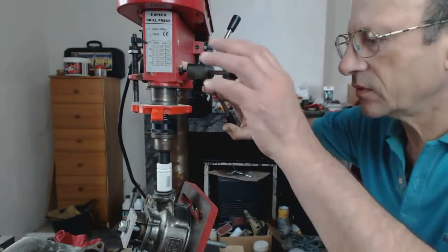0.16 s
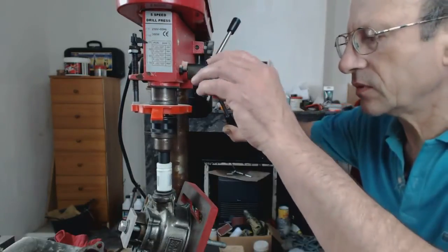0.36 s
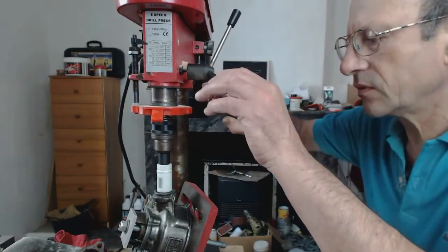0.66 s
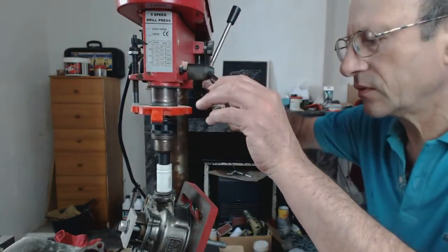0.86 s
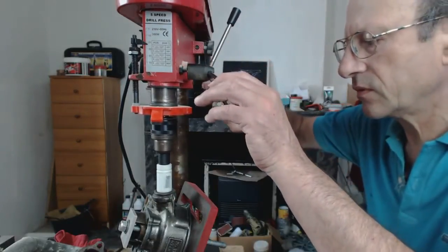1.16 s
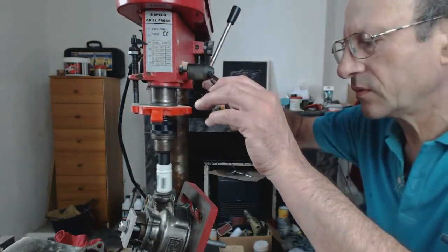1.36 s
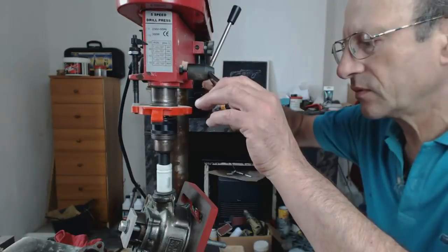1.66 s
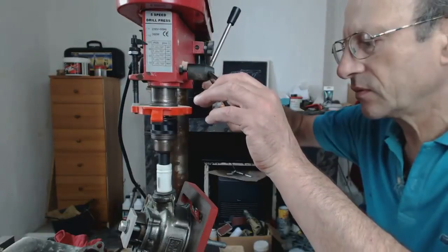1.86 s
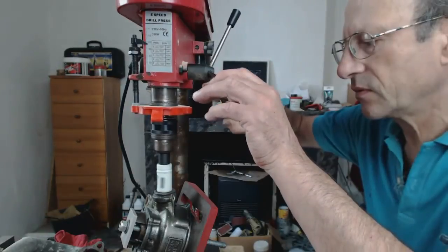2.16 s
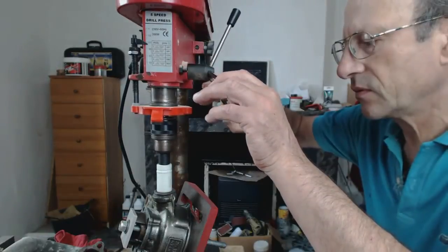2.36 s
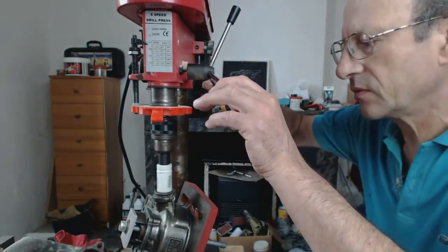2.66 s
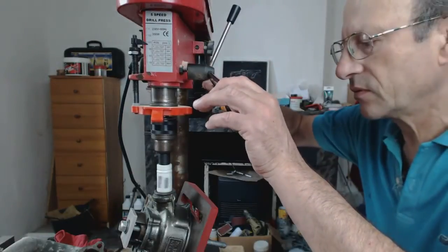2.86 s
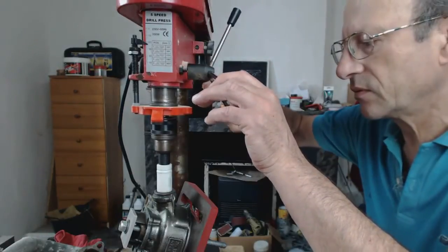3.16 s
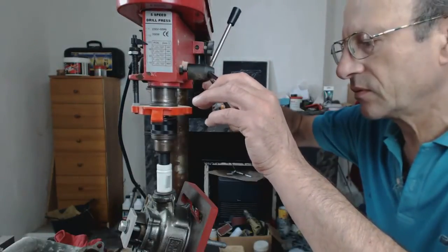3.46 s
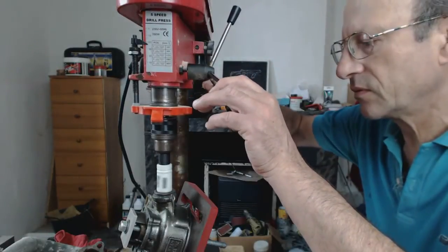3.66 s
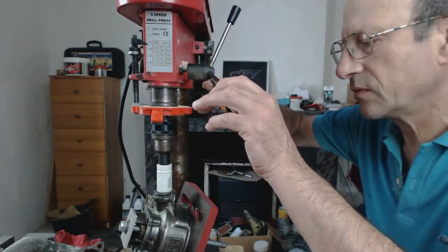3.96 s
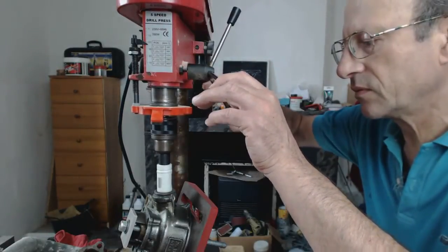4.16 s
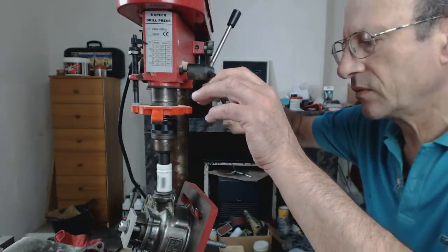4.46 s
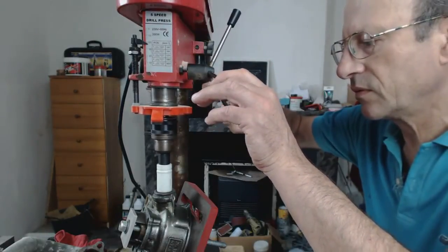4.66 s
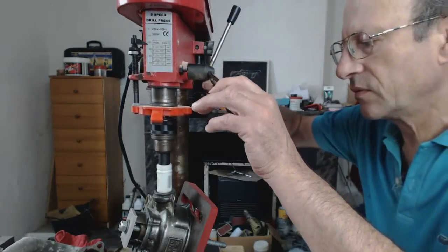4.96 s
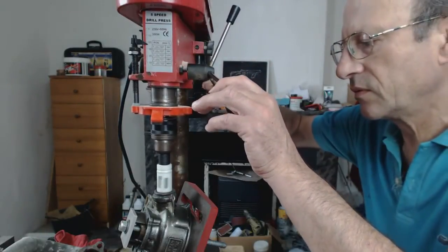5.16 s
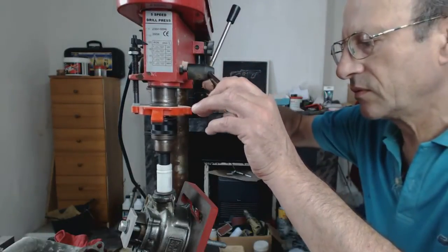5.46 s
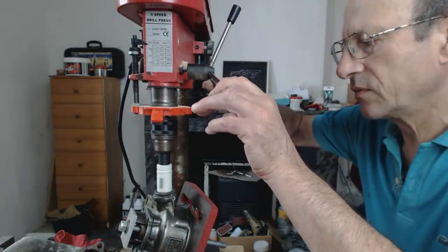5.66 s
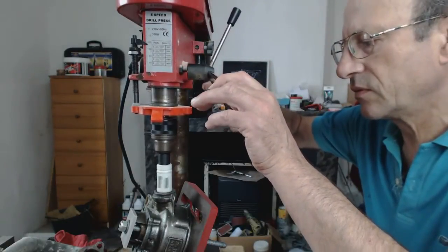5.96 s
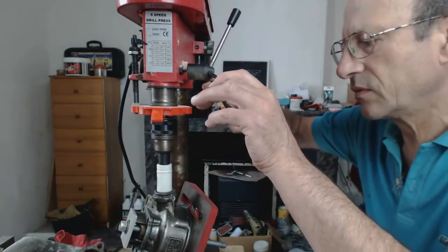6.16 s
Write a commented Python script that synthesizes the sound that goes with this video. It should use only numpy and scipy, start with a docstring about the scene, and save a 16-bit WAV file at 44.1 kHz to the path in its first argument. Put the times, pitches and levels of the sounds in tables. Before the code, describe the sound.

A drill press runs close to the microphone in a small workshop, its motor giving a quiet rumble and hum, with light spindle ticks and brief high squeals of the tool touching metal. At about 0.85 seconds it bites into cast iron: a loud, grinding, ringing chatter with a low groan, crackling chips and dull knocks of the part on its table, lasting until 2.1 seconds. Three more cuts follow, from about 2.6 to 3.3, 3.6 to 4.4 and 4.9 to 6.1 seconds. The crackle turns slightly hollow late in each cut, and the microphone overloads, making the cuts sound rough. In the short gaps the much quieter motor continues, with ticks and thin squeals, clearest just before the first and last cuts. The last cut ends with a few short shudders and falls back to the hum by about 6.2 seconds.

```python
"""A pedestal drill press, close to the microphone in a small workshop, is fed four times into cast iron.
Each cut jolts the resonances of head, part and column, snaps off chips and knocks the part on its table.
Between cuts the motor rumbles and hums, the spindle ticks and a loosely touching edge squeals.
The walls add a short tail; at this distance the microphone overloads during the cuts."""
import sys
import numpy as np
from scipy import signal
from scipy.fft import rfft, irfft
from scipy.io import wavfile
from scipy.ndimage import uniform_filter1d

SR = 44100
rng = np.random.default_rng(int(sys.argv[2]) if len(sys.argv) > 2 else 0)


def pcm_store(signal):
    """Save signal as 16-bit PCM."""
    levels = np.round(np.clip(np.atleast_2d(signal), -1, 1) * 32767)
    wavfile.write(sys.argv[1], SR, levels.astype(np.int16).T)


N = 277830

# Modes of head (first five), part (next four) and edge. Each row: pitch in Hz, width in Hz, gain in dB.
FRAME_MODES = [(595, 99, -17), (658, 31.5, 4), (711.6, 14, -9.5), (794, 18, -14), (794, 6.1, -6.5),
               (916.3, 30.4, -4), (1000.8, 11.5, 1.5), (1089, 66, -8), (1260, 63, -30), (1426, 23, -10),
               (1785, 24, -12), (2100, 13, -42), (2585, 27, -11.5), (3113, 17, -17), (3545, 25.5, -16),
               (4140, 33, -23.5)]
# Low modes of the column. Each row: pitch in Hz, width in Hz, gain in dB.
COLUMN_MODES = [(323.8, 8.3, -9), (349.7, 12.4, -6), (395.3, 13.3, 2), (444.2, 8.4, -0.5)]


def amp(db):
    """Gain of a dB value."""
    return 10 ** (np.asarray(db) / 20)


def rms_one(x):
    """Scale to rms 1."""
    return x / np.sqrt(np.mean(x ** 2) + 1e-20)


def butter(x, hz, order, kind="low"):
    """Butterworth filter, low-pass by default."""
    return signal.sosfilt(signal.butter(order, hz, kind, fs=SR, output="sos"), x)


def per_bin(hz, values):
    """Join points along log frequency, one value per FFT bin."""
    grid = np.maximum(np.arange(N // 2 + 1) * SR / N, 1)
    return np.interp(np.log(grid), np.log(hz), values)


def colour(x, spectrum):
    """Shape a sound by (Hz, dB) points."""
    return irfft(rfft(x) * amp(per_bin(*np.transpose(spectrum))), N)


def drift(hz):
    """Slow random wander, rms 1."""
    r = np.exp(-2 * np.pi * hz / SR)
    return rms_one(signal.lfilter([1], [1, -2 * r, r * r], rng.standard_normal(N + SR))[SR:])


def grains(per_s, spread_db):
    """Random clicks of uneven size and sign, rms 1."""
    sizes = amp(spread_db * np.minimum(rng.exponential(1, N), 5)) * rng.choice([-1, 1], N)
    return rms_one(sizes * (rng.random(N) < per_s / SR))


def decay(clicks, seconds):
    """Give each click an exponential tail."""
    return signal.lfilter([1], [1, -np.exp(-1 / (seconds * SR))], clicks)


def resonate(x, modes):
    """Parallel resonances (Hz, width in Hz, dB) with alternating signs."""
    out = 0
    for k, (hz, width, db) in enumerate(modes):
        r = np.exp(-np.pi * width / SR)
        b = (1 - r * r) / 2 * np.array([1, 0, -1])
        a = [1, -2 * r * np.cos(2 * np.pi * hz / SR), r * r]
        out = out + (-1) ** k * amp(db) * signal.lfilter(b, a, x)
    return out


def evened(ring, samples):
    """A steadily driven ring keeps its swing: slow beats are mostly levelled."""
    swing = np.sqrt(uniform_filter1d(ring ** 2, size=samples)) / np.std(ring)
    return rms_one(ring / (swing + 0.2))


def workshop(x, t60):
    """The walls of a small room return a short, dense tail."""
    t = np.arange(round(.5 * SR)) / SR
    tail = rng.standard_normal(len(t)) * amp(-60 * t / t60) * (t > .001)
    return signal.fftconvolve(x, tail / np.sqrt(np.sum(tail ** 2)))[:N]


def motor():
    """The running motor rumbles through column and frame, over its mains hum."""
    # Colour of the rumble. Each row: frequency in Hz, gain in dB.
    idle_spectrum = [(24, -56), (40, -37), (86, -30.5), (202, -2), (271, 4), (381, 1.5), (499, -35),
                     (654, -1.5), (992, -15.5), (1400, 2), (5520, -51), (6880, -22), (14000, -71)]
    # Mains hum. Each row: frequency in Hz, rms level in dB.
    hum_tones = [(100, -61.5), (200, -63)]
    t, noise = np.arange(N) / SR, rng.standard_normal(N)
    shaken = noise + amp(16) * resonate(noise, COLUMN_MODES + FRAME_MODES)
    rumble = rms_one(colour(shaken, idle_spectrum)) * amp(-46 + 2 * drift(hz=8.6))
    return rumble + sum(np.sqrt(2) * amp(db) * np.sin(2 * np.pi * hz * t) for hz, db in hum_tones)


def spindle():
    """Play in the spindle makes bright ticks, each with a blunt blow that rings the frame."""
    # Each row: start in seconds, tick strength in dB, blow relative to the tick in dB.
    ticks = [(0.044, -32, -15), (0.1444, -47, -1), (0.2094, -60, -4), (0.2244, -59, -1), (0.2714, -54, 9),
             (0.3414, -60, 23.5), (0.388, -62, 5), (0.4239, -67, 20), (0.4773, -56, 3), (0.5197, -68, 15),
             (0.554, -58, 20), (0.598, -51, -4), (0.6724, -53, 15), (0.7244, -61, 2), (0.7667, -47, -1),
             (2.1594, -34, 14), (2.1994, -45, -15), (2.36, -49, -6), (3.3997, -44, 5), (3.476, -47, -1),
             (3.581, -21.5, -13), (4.569, -57, -9), (4.6648, -44.5, -2), (4.7526, -41, -16),
             (4.8194, -46, 13)]
    clicks, blows = np.zeros((2, N))
    for s, db, blow_db in ticks:
        clicks[round(s * SR)] = amp(db)
        blows[round(s * SR)] = amp(db + blow_db)
    clicks += amp(-91) * np.abs(grains(per_s=60, spread_db=14.5))   # faint rattle between the ticks
    envelope = butter(decay(clicks, seconds=.014), 300, order=1)
    ticking = butter(envelope * rng.standard_normal(N), [2200, 8500], order=4, kind="band")
    blunt = butter(blows + 1e-18, 1250, order=3)
    return ticking + amp(42) * resonate(blunt, FRAME_MODES)


def edge_squeal():
    """A light touch of the edge excites high modes of the tool: quick attack, slow sag, release."""
    # Each row: start in seconds, length in seconds, squeal level in dB, thin whistle level in dB.
    touches = [(0.0, 0.026, -50, -75), (0.058, 0.056, -45.5, -55), (.15, .04, -53, -65),
               (0.218, 0.064, -57, -72), (0.763, 0.12, -36.5, -60), (.845, .03, -28, -60),
               (2.104, 0.25, -48, -78), (2.355, .09, -52, -83), (3.3, 0.064, -48.5, -72),
               (3.392, 0.028, -46, -74), (3.48, 0.1, -46.5, -80), (4.33, 0.15, -45, -80),
               (4.485, .04, -54, -85), (4.563, .05, -51, -86), (4.658, 0.068, -52, -67),
               (4.746, 0.038, -39.5, -66), (4.838, 0.055, -49, -71), (4.9, .07, -33, -62),
               (5.93, .04, -45.5, -64), (5.983, .03, -45.5, -55), (6.03, .2, -52, -78)]
    # The tool's high modes, in two sets. Each row: pitch in Hz, width in Hz, gain in dB.
    squeal_modes = [(5800, 10, -3.5), (6050, 35, -11), (6550, 60, -20.5), (6770, 69, -24),
                    (8500, 220, -25.5)]
    whistle_modes = [(14100, 70, 0), (12500, 70, -15)]
    attack_s, release_db_per_s = 0.0048, 350
    squeal_sag_db_per_s, whistle_sag_db_per_s = 63, 305
    squeal_gain, whistle_gain = np.zeros((2, N))
    for s, length, squeal_db, whistle_db in touches:
        t = np.maximum(np.arange(N) / SR - s, 0)
        touch = np.minimum(t / attack_s, 1) * amp(-release_db_per_s * np.maximum(t - length, 0))
        squeal_gain += touch * amp(squeal_db - squeal_sag_db_per_s * t)
        whistle_gain += touch * amp(whistle_db - whistle_sag_db_per_s * t)
    slip = rng.standard_normal((2, N))
    squeal = evened(resonate(resonate(slip[0], squeal_modes), [(5700, 1400, 0)]), samples=900)
    whistle = rms_one(resonate(resonate(slip[1], whistle_modes), [(13800, 2500, 0)]))
    return squeal_gain * squeal + whistle_gain * whistle


def table_knocks(shake_db):
    """The part knocks its table: dull thumps of a cycle or two over a rumble that follows the feed."""
    # Each row: start in seconds, strength in dB.
    knocks = [(0.919, -29), (1.015, -13), (1.163, -15), (1.515, -24), (1.555, -29), (1.608, -7.5),
              (1.731, -22), (1.833, -7), (1.873, -3.5), (1.931, -2), (2.039, -15), (2.078, -16),
              (2.136, -29), (2.609, -27), (2.661, -35), (2.784, -4), (2.884, -7), (2.921, -4.5),
              (2.988, -6), (3.008, 1.5), (3.065, -14), (3.115, 4), (3.702, -14), (3.759, -9), (3.827, -29),
              (3.887, -5), (3.978, 0), (3.998, -3), (4.034, -6.5), (4.15, -2.5), (4.99, -23), (5.106, -25),
              (5.148, -14), (5.227, -9.5), (5.254, -6.5), (5.318, -16), (5.413, -2.5), (5.484, -5),
              (5.532, -3.5), (5.557, -4), (5.601, -0.5), (5.703, -2.5), (5.811, -2.5), (5.9, 0),
              (5.986, -12)]
    # Modes of the table. Each row: pitch in Hz, width in Hz, gain in dB.
    table_modes = [(110, 40, -3.5), (157, 17.5, 0), (233, 90, -3.5)]
    jolts = resonate(grains(per_s=120, spread_db=-1.5), [(175, 84, 0)])
    rumble_db = 0.5 + shake_db + 2.07 * np.clip(shake_db + 10, -10, 0)
    out = amp(rumble_db) * rms_one(resonate(jolts, table_modes))
    t = np.arange(round(.04 * SR)) / SR
    swell = np.exp(-((t - .011) / 0.0031) ** 2)
    for s, db in knocks:
        at, hz, phase = round(s * SR), rng.uniform(150, 250), rng.random()
        size = amp(db + 4 + .3 * max(db + 22, 0))
        out[at:at + len(t)] += size * swell * np.sin(2 * np.pi * (hz * t + phase))
    return out


def chips(chip_db):
    """Chips break off in clumps: dense snaps with short tails; a light touch is duller."""
    # Colour of the crackle. Each row: frequency in Hz, gain in dB.
    chip_spectrum = [(880, -8.5), (1500, -4), (1890, 4.5), (2290, -3), (2520, 0), (3860, -8), (5100, -5),
                     (7500, -13.5), (9820, -15.5), (14200, -37), (15000, -17)]
    snaps = grains(per_s=250, spread_db=0.5) * amp(4.2 * drift(hz=18))
    tails = decay(np.abs(snaps), seconds=0.0023) * rng.standard_normal(N)
    hiss = amp(2 + 0.17 * drift(hz=45)) * rng.standard_normal(N)
    bright = rms_one(colour(rms_one(tails) + hiss, chip_spectrum))
    dull = butter(bright, 7800, order=4)
    bite = np.clip((chip_db + 55) / 22, 0, 1) ** 2
    return amp(chip_db + 1.115 * np.maximum(chip_db + 23.5, 0)) * (dull + bite * (bright - dull))


def hollowed(crackle):
    """Late in each cut the crackle turns hollow as a treble band sinks."""
    # Each row: start in seconds, end in seconds, depth from 0 to 1.
    spells = [(1.734, 2.1, 0.63), (3.196, 3.3, .4), (4.273, 4.35, 0.66), (5.695, 5.92, .55)]
    # The band that sinks. Its row: centre in Hz, width in Hz, gain in dB.
    band = [(6150, 1500, 1.5)]
    t = np.arange(N) / SR
    dip = sum(depth * (t > start) * (t < end) for start, end, depth in spells)
    return crackle - uniform_filter1d(dip, size=800) * resonate(crackle, band)


def with_catches(db, member):
    """One member's drive in dB: it wavers, and swells briefly when the tool catches and shakes it."""
    # Each row: time of the peak in seconds, member shaken, peak drive in dB.
    catches = [(.09, "column", -36), (0.089, "part", -38.5), (.26, "column", -32.5), (.32, "column", -38.5),
               (.535, "head", -38), (.59, "head", -40), (.79, "column", -34), (.795, "head", -33),
               (2.03, "part", -19), (2.07, "part", -19.5), (3.33, "part", -29.5), (3.425, "column", -20.5),
               (3.63, "part", -11), (4.38, "edge", -26.5), (4.399, "column", -19), (4.905, "edge", -24.5),
               (0.866, "column", -17), (.93, "part", -13), (1.42, "part", -12.5), (4.77, "part", -47),
               (4.82, "head", -35), (5.94, "part", -16.5), (5.96, "head", -19.5), (5.99, "part", -14.5),
               (6.03, "column", -16.5), (6.049, "head", -16.5), (6.09, "column", -16.5)]
    waver_db, half_width_s = 1.1, 0.0097
    t = np.arange(N) / SR
    power = amp(2 * (db + waver_db * drift(hz=15)))
    for s, name, peak_db in catches:
        if name == member:
            power += amp(2 * peak_db) * np.exp(-((t - s) / half_width_s) ** 2)
    return 10 * np.log10(power)


def column_groan(groan_db):
    """The cut shakes the column, and its low modes groan."""
    ring = resonate(resonate(rng.standard_normal(N), COLUMN_MODES), [(394, 210, 0)])
    return amp(groan_db + 0.44 * np.maximum(groan_db + 18.5, 0)) * evened(ring, samples=1200)


def frame_ring(head_db, part_db, edge_db):
    """The cutting force jolts the modes of head, part and edge; hard feed makes them chatter louder."""
    # Noise between the modes, a list each for head, part and edge. Each row: frequency in Hz, gain in dB.
    floors = [
        [(150, -26), (300, -18), (520, -8), (800, -20.5), (1000, -55), (3000, -83)],
        [(500, -30.5), (800, -9), (1250, -21.5), (1600, -34), (4000, -91)],
        [(700, -48), (1250, -13.5), (2200, -18.5), (3000, -26), (9000, -53)],
    ]
    jolts = grains(per_s=3000, spread_db=4) * amp(3.9 * drift(hz=32))
    force = butter(jolts, 5260, order=4)
    members = FRAME_MODES[:5], FRAME_MODES[5:9], FRAME_MODES[9:]
    out = 0
    for modes, floor, db in zip(members, floors, (head_db, part_db, edge_db)):
        top_hz = modes[-1][0]
        body = butter(resonate(force, modes), 5 * top_hz, order=2) + colour(force, floor)
        chatter_db = 0.41 * np.maximum(db + 17, 0)
        out = out + amp(db + chatter_db) * evened(body, samples=1500)
    return out


def scene():
    """The press stands close in front of the microphone, with a little of the workshop behind it."""
    # The feed, one list a cut. Each row: time in seconds, then drive of chips, part and column in dB.
    cuts = [
        [(.84, -58, -61, -57), (.858, -19, -27.5, -22), (.9, -21, -14, -16.5), (1.02, -16, -10.5, -12),
         (1.22, -19, -14, -11), (1.335, -22.5, -21, -16), (1.37, -19, -16.5, -26), (1.46, -21, -15, -20),
         (1.54, -15.5, -11.5, -14), (1.72, -17, -14.5, -13.5), (1.92, -16, -19, -13.5),
         (1.96, -17.5, -32, -12.5), (2.08, -21, -28.5, -13), (2.105, -31.5, -43, -13.5), (2.13, -42, -35, -41),
         (2.18, -40, -43, -35), (2.3, -51.5, -48, -43)],
        [(2.545, -51, -57, -50), (2.575, -21, -32, -48), (2.595, -17.5, -13.5, -36),
         (2.615, -21.5, -11.5, -11.5), (2.68, -19, -13, -10), (2.72, -16, -12, -11), (2.94, -16, -11, -12.5),
         (3.18, -15, -12, -10.5), (3.26, -24.5, -17, -11.5), (3.3, -40, -33, -16), (3.36, -57, -54, -19),
         (3.395, -50, -46, -47)],
        [(3.55, -52, -48.5, -44), (3.6, -30, -50, -39), (3.625, -20, -14, -28), (3.67, -17.5, -16.5, -12),
         (3.79, -16, -11.5, -11), (3.92, -16.5, -13.5, -18), (3.96, -15.5, -13, -12.5), (4.22, -16, -14.5, -13),
         (4.29, -18.5, -15.5, -10), (4.33, -24.5, -20, -11.5), (4.375, -45, -44, -27), (4.46, -53, -59, -52)],
        [(4.885, -55, -51, -50), (4.91, -23, -28, -26), (4.94, -23.5, -22, -19), (5.0, -18.5, -16.5, -12.5),
         (5.055, -26, -22.5, -14.5), (5.09, -16.5, -11, -16), (5.5, -16.5, -13.5, -10), (5.89, -16.5, -14, -12),
         (5.915, -25.5, -32.5, -14.5), (5.97, -33, -29, -18.5), (6.0, -24, -25, -33), (6.03, -29, -30.5, -33),
         (6.11, -40.5, -41.5, -34), (6.2, -51, -49.5, -43)],
    ]
    times, *drives = np.concatenate(cuts).T
    feed_db = [np.interp(np.arange(N) / SR, times, drive) for drive in drives]
    chip_db, part_db, groan_db = np.maximum(feed_db, [[-59], [-51.5], [-46.5]])   # tool spinning free
    head_db = 2.1 + 0.38 * part_db + 0.62 * chip_db
    edge_db = -0.5 + part_db - 0.98 * np.maximum(chip_db - part_db, 0)   # weaker when chips dominate
    ring = frame_ring(with_catches(head_db, "head"), with_catches(part_db, "part"),
                      with_catches(edge_db, "edge"))
    groan = column_groan(with_catches(groan_db, "column"))
    crackle = hollowed(chips(chip_db))
    press = ring + groan + crackle + table_knocks(head_db) + edge_squeal() + motor() + spindle()
    near = press + amp(-14) * butter(workshop(press, t60=0.37), 3700, order=1)
    return np.array([near, near])


def record(dry):
    """The close microphone overloads into flat tops, a bass cut tilts them; the channels differ a little."""
    # Stereo image. Each row: frequency in Hz, side relative to mid in dB, lean from -1 (right) to 1 (left).
    image = [(60, -26, -.2), (200, -25, -.2), (320, -16, .5), (420, -15, .6), (870, -18, .1),
             (1700, -25, .4), (2400, -40, 0), (3400, -20, -.5), (4500, -21, 0), (5900, -16, .7),
             (7000, -22, .3), (9000, -42, 0)]
    ceiling, hardness, cutoff_hz = .68, 3.5, 15400
    flat = dry[0] / (1 + np.abs(dry[0] / ceiling) ** hardness) ** (1 / hardness)
    tilted = butter(flat, 95, order=1, kind="high")
    mid = butter(tilted, 55, order=2, kind="high")
    hz, side_db, lean = np.transpose(image)
    side_gain, lean = amp(per_bin(hz, side_db)), per_bin(hz, lean)
    scattered = workshop(mid, t60=.06)
    side = irfft(side_gain * (lean * rfft(mid) + np.sqrt(1 - lean ** 2) * rfft(scattered)), N)
    stereo = np.clip([mid + side, mid - side], -.93, .93)
    treble_cut = signal.cheby2(14, 60, cutoff_hz, fs=SR, output="sos")
    return signal.sosfilt(treble_cut, stereo).clip(-1, 1)


dry = scene()
out = record(dry)
pcm_store(out)
```